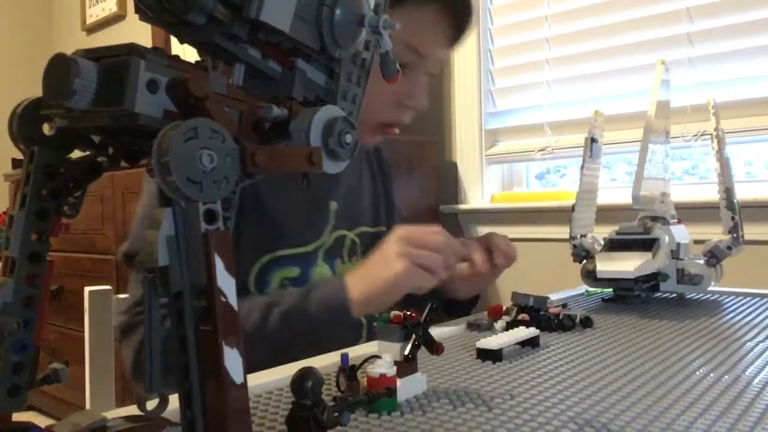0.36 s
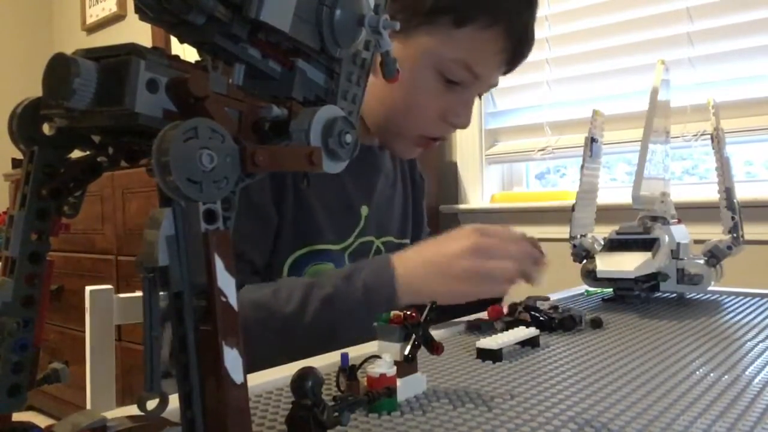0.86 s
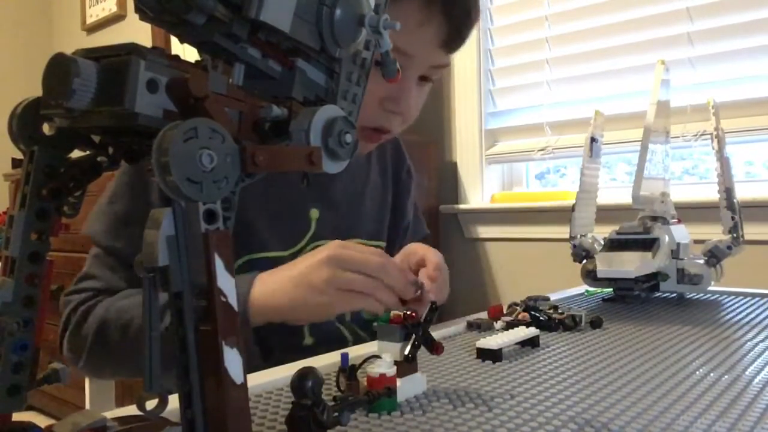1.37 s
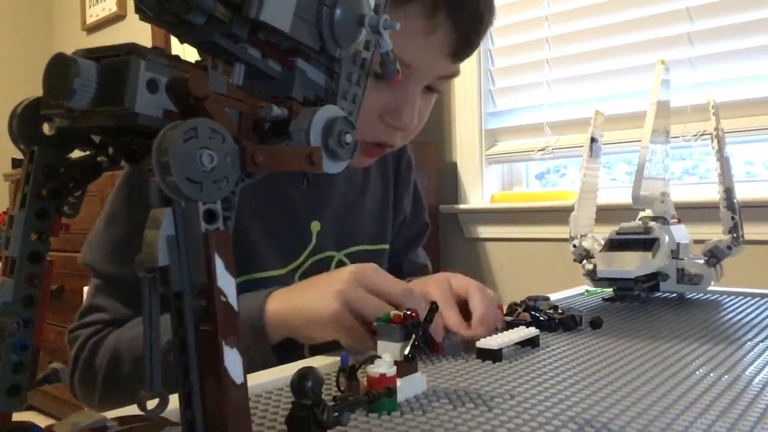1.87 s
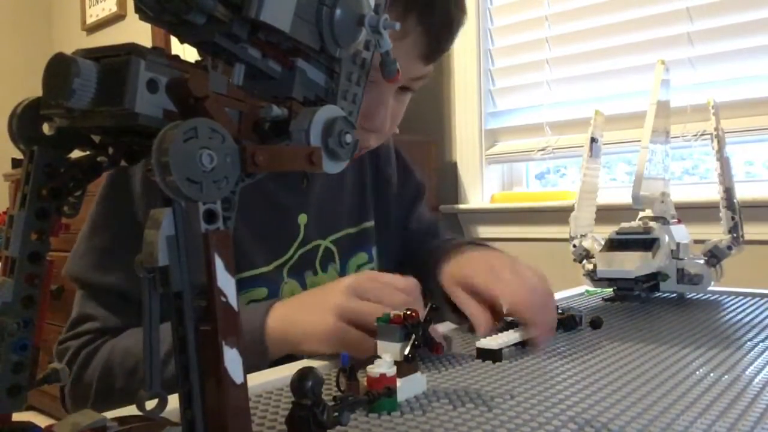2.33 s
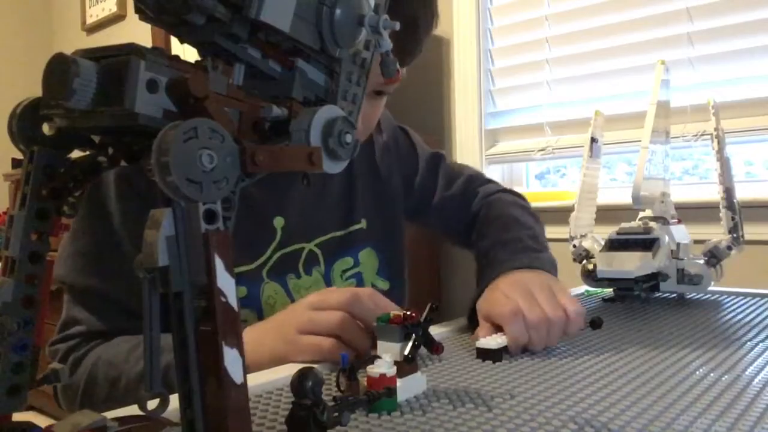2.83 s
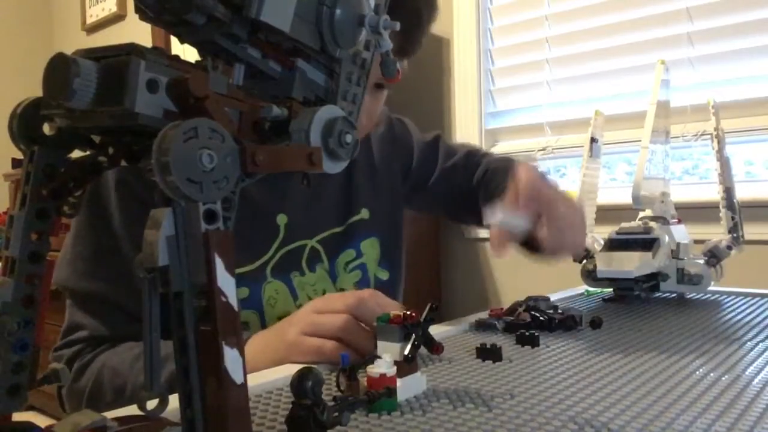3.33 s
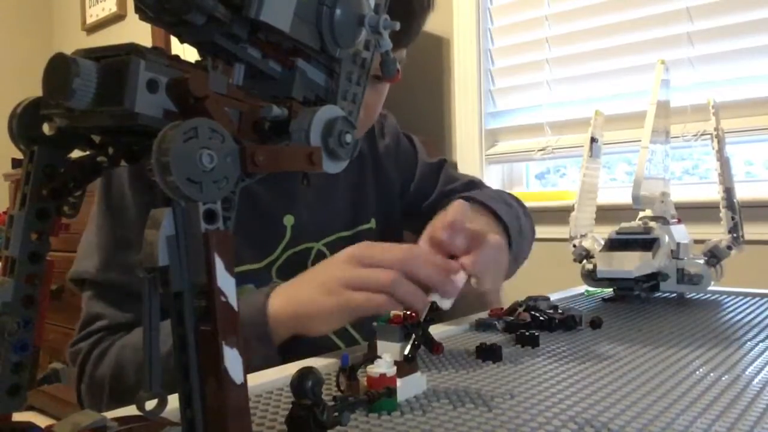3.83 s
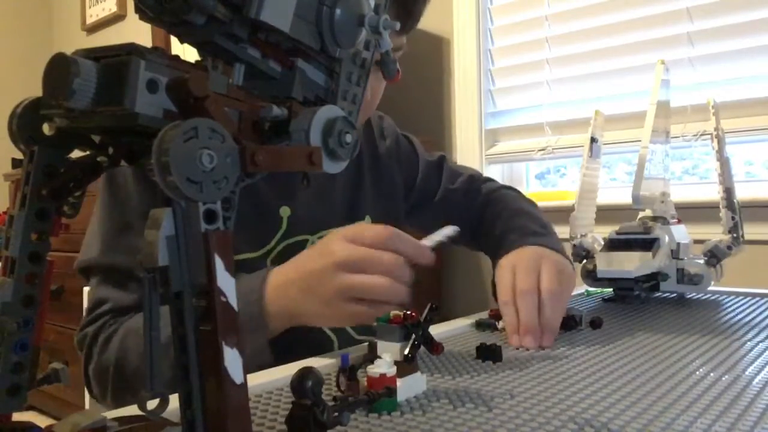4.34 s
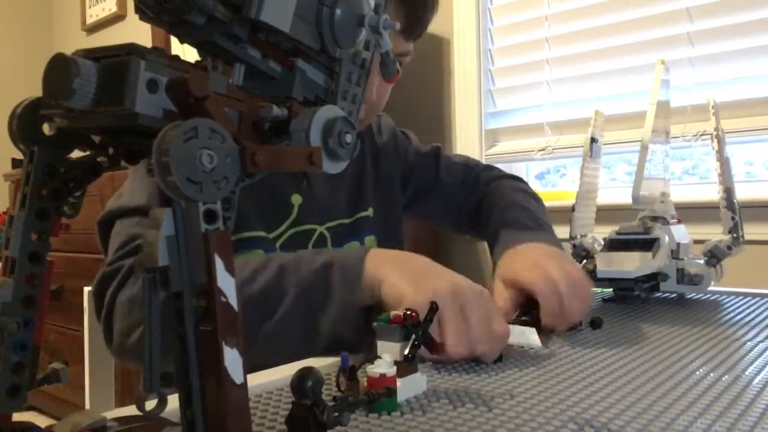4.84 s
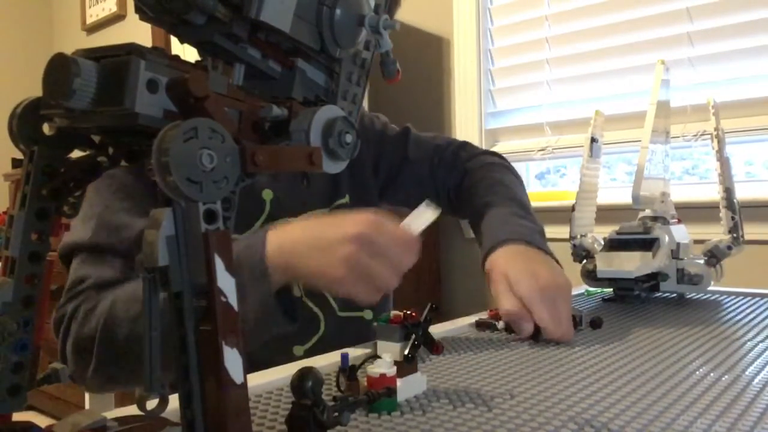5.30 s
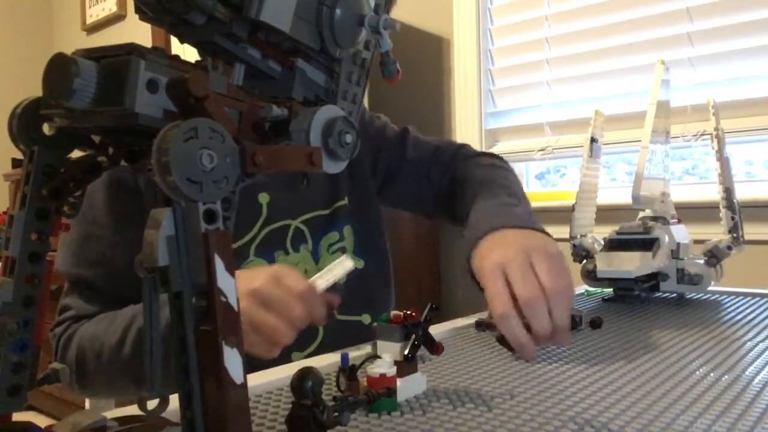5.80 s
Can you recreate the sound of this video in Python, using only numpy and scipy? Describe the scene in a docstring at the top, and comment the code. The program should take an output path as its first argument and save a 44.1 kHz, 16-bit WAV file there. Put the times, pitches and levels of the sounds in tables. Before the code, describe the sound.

Plastic toy bricks are handled on a table in a small furnished room. After near quiet, a quick clatter of clicks breaks out, then one sharp loud snap with a dull table thump. Sparse light ticks, brief dry slides and brisker clicks follow, ending with a crisp tick. Close small microphone, short room reflections, faint hiss and low house rumble.

```python
"""Plastic bricks on a table, small furnished room

Hands pick up small plastic bricks and press them together over a studded baseplate on a table.
Bricks click and rattle as contacts ring their damped modes; presses push the table top into a low thump.
Fingers and pieces slide with a dry rustle made of tiny slips. The bricks reach the microphone directly
and by the walls, the thumps mostly directly, over faint house rumble and microphone hiss."""
import sys
import numpy as np
from scipy import signal
from scipy.fft import rfft, irfft
from scipy.io import wavfile

SR = 44100
rng = np.random.default_rng(int(sys.argv[2]) if len(sys.argv) > 2 else 0)


def ratio_of_db(decibels):
    """Turn decibels (scalar or array-like) into linear amplitude factors; 0 dB maps to 1."""
    return 10 ** (np.asarray(decibels, float) / 20)


def to_wav(s):
    """Save 16-bit WAV."""
    ch = np.atleast_2d(s).T  # columns
    pcm = np.round(np.clip(ch, -1, 1) * 32767)  # PCM
    wavfile.write(sys.argv[1], SR, pcm.astype(np.int16))


N = 272538  # samples

# brick clicks: start_s, body_db, body_focus_hz, dull_db, bright_db (peak level of each family)
BRICK_CLICKS = [(0.0215, -45.5, 2000, -54, -43), (0.7321, -33.5, 2400, -40, -30.5),
                (0.7497, -37, 3350, -31, -37), (0.7574, -29, 2430, -37.5, -33),
                (0.7805, -38, 2680, -55, -31.5), (0.805, -40, 2500, -49, -40),
                (0.847, -31, 2430, -39.5, -42), (0.9009, -44, 3040, -60, -53),
                (0.9128, -44, 2450, -51, -50), (0.9378, -44, 2430, -60, -65), (0.9462, -44, 2440, -57, -62),
                (0.9683, -50, 2580, -48.5, -64), (0.9904, -43, 2480, -53, -56),
                (1.0174, -42, 3000, -51, -47.5), (1.0394, -48, 2440, -51, -60),
                (1.7076, -34.5, 2800, -30, -29), (1.7253, -41, 2450, -42, -38),
                (1.7689, -14, 3900, -34, -11), (2.0264, -34, 3900, -41, -34.5),
                (2.0876, -38.5, 3310, -48, -43), (2.2795, -57, 3650, -59.5, -61),
                (2.3501, -50.5, 1940, -57, -69), (2.4109, -49, 2690, -51, -50),
                (2.4305, -48, 2580, -43.5, -51), (2.461, -43.5, 2590, -47.5, -47.5),
                (2.5082, -45, 2720, -50, -39.5), (2.5607, -53.5, 1870, -51, -63),
                (2.5985, -54, 2550, -50.5, -64), (2.7229, -41, 3070, -45, -47),
                (2.8286, -34, 4430, -47, -36.5), (2.9905, -52, 2590, -50.5, -69),
                (3.1007, -34, 3170, -46, -33.5), (3.1091, -27.5, 2720, -43, -32),
                (3.1288, -34.5, 4760, -59, -45), (3.2328, -31, 2800, -43.5, -22),
                (3.2545, -36.5, 3607, -46.5, -36), (3.2667, -39.5, 3080, -51, -38),
                (3.2895, -37.5, 3556, -61, -32.5), (3.5417, -52.5, 2700, -47.5, -51),
                (3.6183, -32, 2300, -40.5, -34.5), (3.713, -27, 3000, -44, -31.5),
                (3.7295, -31.5, 2800, -45, -30.5), (4.2573, -40.5, 2630, -51, -47),
                (4.3084, -54.5, 2290, -51.5, -58), (4.4736, -50, 2700, -54, -54.5),
                (4.5011, -46, 1850, -51, -54), (4.6263, -44.5, 2700, -47.5, -50.5),
                (4.8003, -51.5, 2670, -60, -55.5), (4.89, -53, 1860, -51.5, -52.5),
                (4.9372, -45, 2950, -44, -48), (5.0, -42.5, 2920, -40, -46.5),
                (5.0143, -45.5, 2690, -58, -58), (5.3383, -29, 2420, -33, -36),
                (5.4256, -50, 2710, -53, -56), (5.4504, -44, 2630, -58, -62),
                (5.529, -43, 3620, -49, -38.5), (5.547, -38, 3530, -65, -42),
                (6.0307, -46, 3050, -50.5, -55.5), (5.953, -57, 2300, -58, -68),
                (6.072, -50, 2900, -60, -62), (6.0821, -47, 3630, -58, -47), (6.098, -34, 2840, -52, -37),
                (6.1487, -23.5, 3800, -46, -35)]
# modes of a brick, one list a family (body, dull, bright): pitch_hz, relative_level_db
BRICK_MODES = [
    [(2050, -1.5), (2450, 0), (2750, 0), (3150, 1.5), (3660, 1.5), (4150, -1), (4750, 1)],
    [(650, -4.5), (850, -4), (1070, -2), (1370, 5), (1700, 2.5)],
    [(5300, 3.5), (5800, 0), (6280, 5.5), (6900, 6), (7550, 5.5), (7950, 5), (8400, -6), (9250, 3),
     (10150, 4), (10850, 1.5), (11500, -3), (12300, -21), (13100, -5.5), (14200, -32.5)],
]
# decay of small, heavily damped plastic, one value a family (body, dull, bright): t60_s
BRICK_DECAYS = (.0065, .008, .006)
# presses and knocks on the table: start_s, level_db (before the push softens it), deep_against_main_db
TABLE_THUMPS = [(0.748, -50.5, -30), (0.846, -51, -21), (1.71, -28.5, -30), (1.769, -43.5, -18),
                (2.023, -49.5, -27), (2.285, -48, -7.5), (2.408, -45, -7), (2.43, -40.5, -6.5),
                (2.46, -42.5, -3), (2.615, -54, -8), (2.722, -46, -15), (2.748, -43, -10.5),
                (2.999, -57.5, -3), (3.102, -31.5, -8), (3.128, -42, 3.5), (3.618, -50, -3),
                (3.713, -47.5, -15), (4.258, -41, -8), (4.626, -42, -10), (4.94, -39, -5),
                (5.001, -43.5, -14), (5.038, -52.5, -1.5), (5.34, -30.5, -30), (5.364, -42, 0.5),
                (6.099, -49, -10), (6.152, -45.5, -22)]
# modes of the table top, three deep ones first: pitch_hz, relative_level_db, t60_s
TABLE_MODES = [(58.8, -12.5, 0.19), (98, -6, 0.21), (147.3, -3, 0.24), (205.9, -1, 0.13),
               (265, -10.5, 0.11), (321.8, -10.5, 0.12), (374.4, -15, 0.12), (460, -27.5, 0.12),
               (591, -20, 0.13)]
# spectrum of the room's rumble and the microphone's hiss: frequency_hz, relative_level_db
BACKGROUND_SPECTRUM = [(12, -69), (29, -24), (39, -9), (60, -4.5), (86, -9.5), (116, -2.5), (142, -7.5),
                       (193, -11), (328, -16), (357, -20), (1370, -27.5), (1910, -27.5), (2460, -27.5),
                       (7520, -31.5), (16000, -40.5)]
# decay of the furnished room: frequency_hz, t60_s
ROOM_DECAY = [(200, 0.38), (1000, 0.15), (3000, 0.18), (7000, 0.2), (12000, 0.15)]
# pieces sliding under the fingers: start_s, length_s, rattle_db, rattle_focus_hz, rustle_db
SLIDE_STROKES = [(0.0, .1, -68, 2300, -66), (0.732, .135, -51, 2280, -51.5), (0.826, 0.16, -55, 2290, -75),
                 (0.965, .125, -57, 2500, -83), (1.058, 0.2, -76, 2450, -66.5), (1.509, .32, -77, 690, -74),
                 (1.75, .27, -55, 2860, -61.5), (1.974, .085, -45, 3560, -54.5),
                 (2.341, .05, -62.5, 2500, -70.5), (2.438, 0.17, -69, 2510, -71),
                 (2.7, .11, -58, 2480, -68.5), (2.792, 0.06, -60, 1990, -75), (2.983, .05, -63, 2270, -86),
                 (3.207, 0.18, -62, 2730, -71), (3.61, .25, -58, 2400, -70.5),
                 (3.93, .19, -73.5, 1400, -77), (4.277, 0.11, -72, 2540, -67.5),
                 (4.383, .056, -63.5, 4500, -65), (4.463, 0.082, -61.5, 3200, -73.5),
                 (4.73, .15, -67, 2800, -82), (4.891, 0.08, -58, 2330, -67.5), (5.05, .2, -69, 1580, -90),
                 (5.414, 0.11, -60, 2560, -77), (6.01, 0.083, -65.5, 2400, -81)]

BODY_MODES, DULL_MODES, BRIGHT_MODES = BRICK_MODES


def evened(x):
    """Scales to rms 1."""
    return x / np.sqrt(np.mean(x ** 2) + 1e-20)


def peaked(x):
    """Scales to peak 1."""
    return x / abs(x).max()


def read(points, hz):
    """Reads a table on a log-frequency axis."""
    f, value = np.transpose(points)
    return np.interp(np.log(hz + 1), np.log(f + 1), value)


def add(mix, start_s, sound):
    """Mixes a sound in at start_s."""
    part = mix[max(round(start_s * SR), 0):][:len(sound)]
    part += sound[:len(part)]


def coloured(x, points):
    """Filters x by a spectrum, then scales it to rms 1."""
    gain = ratio_of_db(read(points, np.fft.rfftfreq(len(x), 1 / SR)))
    return evened(irfft(rfft(x) * gain, len(x)))


def favoured(modes, focus_hz, db_per_octave):
    """The spot that is struck favours the modes near one pitch."""
    hz, db = np.transpose(modes)
    return hz, db - db_per_octave * abs(np.log2(hz / focus_hz))


def ring(hz, db, t60_s, luck, length, spread_db, detune):
    """Dying sines; each blow lands elsewhere, so strengths and pitches scatter."""
    t = np.arange(length)[:, None] / SR
    level_db = db + spread_db * luck[:len(hz)] - 60 * t / t60_s
    pitch_hz = hz * (1 + detune * luck[-len(hz):])
    return (ratio_of_db(level_db) * np.sin(2 * np.pi * pitch_hz * t)).sum(1)


def rumble_and_hiss():
    """Steady rumble of the house and hiss of the microphone: noise shaped by one spectrum."""
    level_db = -67  # rms
    return ratio_of_db(level_db) * coloured(rng.standard_normal(N), BACKGROUND_SPECTRUM)


def slips(modes, per_s, t60_s):
    """Tiny slips of uneven size; each one rings a single brick mode. One row a mode."""
    shape, t = (len(modes), N), np.arange(400) / SR
    size_db = 3.5 * np.minimum(rng.exponential(1, shape), 5)
    impulses = ratio_of_db(size_db) * (rng.random(shape) < per_s / SR)
    envelope = ratio_of_db(-60 * t / t60_s) * (1 - np.exp(-t / 0.0006))
    grains = [envelope * np.sin(2 * np.pi * hz * t) for hz, _ in modes]
    return np.array([evened(y) for y in signal.oaconvolve(impulses, grains, axes=1)[:, :N]])


def sliding():
    """A low rattle and a high rustle of slips swell and fade with each stroke."""
    out = np.zeros(N)
    rise_s = .027  # every stroke is strongest this soon, then eases off
    low_modes = DULL_MODES + BODY_MODES + BRIGHT_MODES[:2]
    low = slips(low_modes, per_s=220., t60_s=.006)
    _, high_db = favoured(BRIGHT_MODES, 8200., 9.5)
    high = evened(ratio_of_db(high_db) @ slips(BRIGHT_MODES, per_s=500., t60_s=.004))
    for start_s, length_s, rattle_db, focus_hz, rustle_db in SLIDE_STROKES:
        at = round(start_s * SR) + np.arange(round(length_s * SR))
        effort = np.interp(at / SR - start_s, [0, rise_s, length_s], [.15, 1, 0]) ** 1.14
        colour = ratio_of_db(favoured(low_modes, focus_hz, 7.0)[1])
        rattle = colour @ low[:, at] / np.linalg.norm(colour)
        add(out, start_s, effort * (ratio_of_db(rattle_db) * rattle + ratio_of_db(rustle_db) * high[at]))
    return out


def clicks():
    """Each contact chatters for a moment and rings the three families of brick modes."""
    out, ms = np.zeros(N), np.arange(900) / SR * 1000
    soft_onset = 1 - np.exp(-np.arange(800) / 13.6)
    # studs rub briefly before they seat, faint against the body modes
    rub_s, rub_db = .008, -22
    rub_length = round(rub_s * SR)
    luck = rng.standard_normal((len(BRICK_CLICKS), 3 * 32 + len(ms)))
    for (start_s, body_db, body_hz, dull_db, bright_db), row in zip(BRICK_CLICKS, luck):
        # studs scrape as they seat, a quick swell and a rough fade; hard blows are over sooner
        slow = np.clip(1 - (max(body_db, bright_db) + 38.5) / 45, .3, 2)
        shape = (1 - np.exp(-ms / (.7 * slow))) * np.exp(-ms / (3.43 * slow))
        # the scrape drives all pitches alike: only its timing is random
        phases = rfft(row[96:] * shape)
        chatter = irfft(phases / abs(phases), len(ms)) * np.sqrt(shape)
        # bright pitch rises with the blow, and again as the bright modes gain on the body modes
        octaves = .006 * (bright_db + 38) + .025 * (bright_db - body_db)
        bright_hz = 7900 * 2 ** octaves
        # a hard blow shakes the whole brick, a light one only the modes near the spot
        families = (favoured(BODY_MODES, body_hz, 15.0 * slow),
                    np.transpose(DULL_MODES),
                    favoured(BRIGHT_MODES, bright_hz, 24. * slow))
        levels_db = body_db, dull_db, bright_db
        for k, (modes, t60_s, db) in enumerate(zip(families, BRICK_DECAYS, levels_db)):
            family_luck = row[32 * k:32 * k + 32]
            ringing = soft_onset * ring(*modes, t60_s, family_luck, 800, spread_db=3.0, detune=0.024)
            add(out, start_s, ratio_of_db(db) * peaked(signal.fftconvolve(ringing, chatter)))
            if k == 0:  # the rub sounds in the body modes only
                rub = row[::-1][:rub_length] * np.linspace(.2, 1, rub_length)
                add(out, start_s - rub_s, ratio_of_db(db + rub_db) * peaked(signal.fftconvolve(ringing, rub)))
    return out


def room(x):
    """Sparse echoes of random sign, each band dying at its own speed; three tails take turns."""
    gap_s, turns_hz = .004, 7.3  # gap before the first echo
    out, turn = np.zeros(N), np.arange(N) / SR * 2 * np.pi * turns_hz
    for k in range(3):
        taps = np.zeros(SR // 2)
        at = np.arange(round(gap_s * SR), SR // 2 - 10, 10)
        taps[at + rng.integers(0, 10, len(at))] = rng.choice([-1., 1.], len(at))
        hz, t, bands = signal.stft(taps, SR, nperseg=128)
        decay = ratio_of_db(-60 * t / read(ROOM_DECAY, hz)[:, None])
        tail = signal.istft(bands * decay, SR, nperseg=128)[1]
        # squares of the three shares always sum to 1
        share = np.sqrt(2 / 3) * np.cos(turn + k * np.pi / 3)
        out += signal.fftconvolve(x * share, tail / np.linalg.norm(tail))[:N]
    return out


def thumps():
    """A soft push of a few milliseconds rings the table top; the deep modes swell more slowly."""
    out, push, modes = np.zeros(N), np.hanning(60), np.transpose(TABLE_MODES)
    swell = 1 - np.exp(-np.arange(14000) / SR / 0.02)
    luck = rng.standard_normal((len(TABLE_THUMPS), 32))
    for (start_s, level_db, deep_db), row in zip(TABLE_THUMPS, luck):
        main = ring(*modes[:, 3:], row[:16], 14000, spread_db=1.0, detune=0.006)
        deep = ring(*modes[:, :3], row[16:], 14000, spread_db=6.0, detune=0.018)
        thump = peaked(swell ** 0.18 * main) + ratio_of_db(deep_db) * peaked(swell * deep)
        add(out, start_s, ratio_of_db(level_db) * np.convolve(thump, push / push.sum()))
    return out


def scene():
    """Bricks reach the microphone directly and by the walls; the table thump is mostly direct."""
    bricks, table = clicks() + sliding(), thumps()
    walls = room(ratio_of_db(-3.0) * bricks + ratio_of_db(-10.5) * table)
    return (bricks + table + walls + rumble_and_hiss())[None]


def roll_off(x):
    """The treble ends steeply here."""
    return signal.sosfilt(signal.butter(12, 16600, fs=SR, output="sos"), x)


def record(dry):
    """The small microphone loses the deepest bass and the very top."""
    bass_cut = signal.butter(5, 40., "high", fs=SR, output="sos")
    top_cut = signal.butter(4, 14500., fs=SR, output="sos")
    mix = signal.sosfilt(np.vstack([bass_cut, top_cut]), dry)
    return roll_off(mix)


dry = scene()
out = record(dry)
to_wav(out)
```